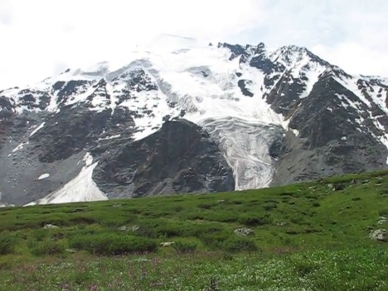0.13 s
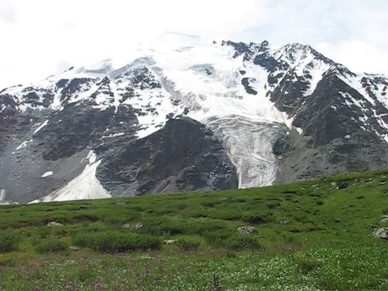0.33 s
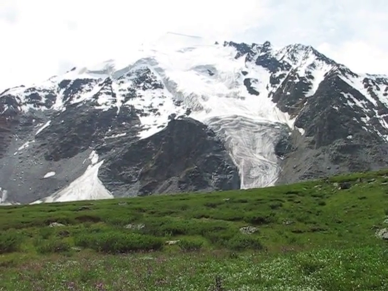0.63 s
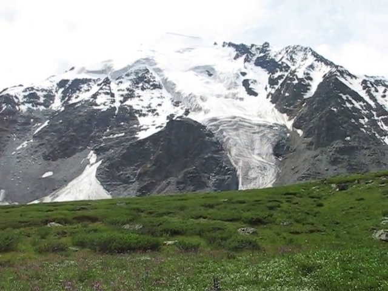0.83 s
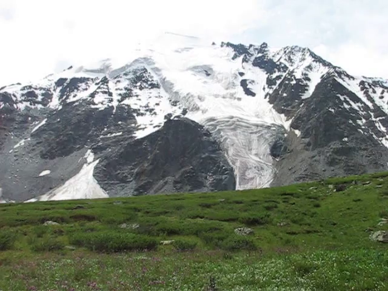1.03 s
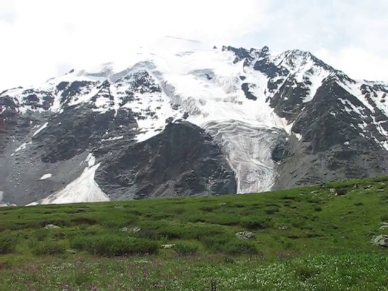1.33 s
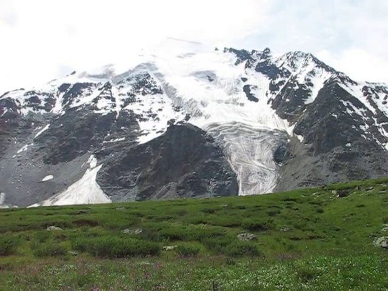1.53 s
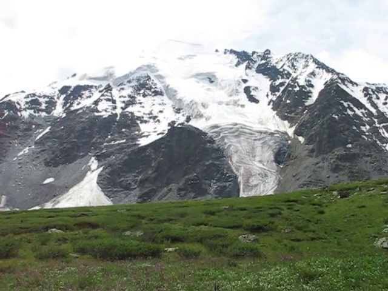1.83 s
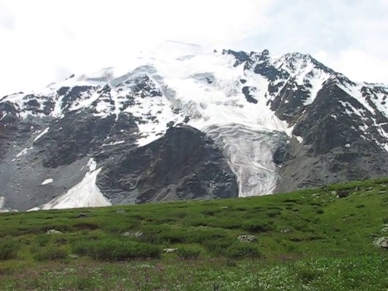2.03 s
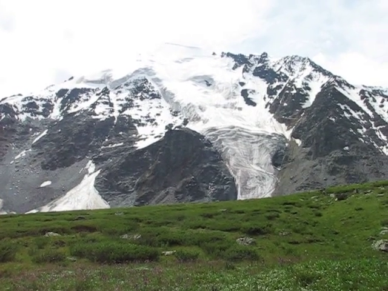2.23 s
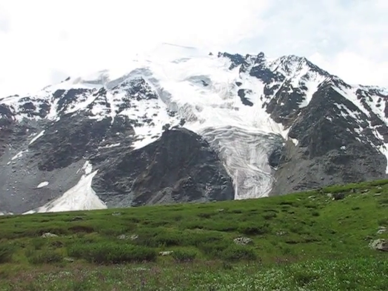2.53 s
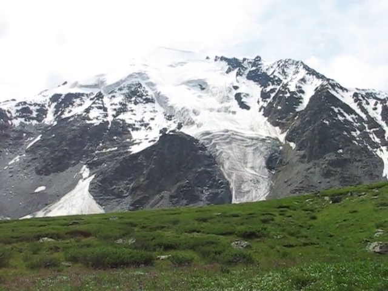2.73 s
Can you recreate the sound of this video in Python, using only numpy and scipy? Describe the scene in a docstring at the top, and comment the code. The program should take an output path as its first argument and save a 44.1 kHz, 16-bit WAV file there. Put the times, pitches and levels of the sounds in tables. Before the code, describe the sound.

Wind rumbles and buffets the microphone throughout, mostly on the left, with a soft airy swell at 0.2 seconds. The hardest gusts crack briefly at about 1.4 seconds and from 2.1 to 2.5 seconds. Behind it, a faint rush of distant water, hiss and a thin high whine dip after those gusts. Fingers lightly rub the microphone's case around 1.7 and 2.6 seconds.

```python
"""Gusty mountain-meadow wind buffets a small camera, mostly on its exposed left microphone port.
Faster air drives the eddies past more quickly, so hard gusts are brighter; the hardest crack against
the port and overload the input. Behind them lie the rush of distant meltwater and the camera's hiss
and thin whine, all dipping after the hardest gusts. One soft airy swell passes early on;
later, fingers rub the case lightly twice."""
import sys
import numpy as np
from scipy import signal
from scipy.fft import rfft, irfft, next_fast_len
from scipy.io import wavfile
from scipy.ndimage import map_coordinates

SR = 44100
rng = np.random.default_rng(int(sys.argv[2]) if len(sys.argv) > 2 else 0)


def transcribe(u):
    """Save the signal u as a 16-bit wav file named by the first command-line argument.

    u: samples, shape (n,) or (channels, n), limited to [-1, 1]; the rate is SR.
    q: integer samples, one column per channel.
    """
    v = np.clip(np.atleast_2d(u).T, -1, 1)
    q = np.round(v * 32767).astype(np.int16)
    wavfile.write(sys.argv[1], SR, q)


N = 127890
T = np.arange(N) / SR


def amp(db):
    """dB to gain."""
    return 10 ** (np.asarray(db) / 20)


def curves(rows):
    """Breakpoints to one per-sample curve for each column after the time."""
    knots_s, *columns = np.transpose(rows)
    return [np.interp(T, knots_s, column) for column in columns]


def bump(centre_s, width_s):
    """Gaussian of peak 1; full width at half height."""
    return .5 ** ((2 * (T - centre_s) / width_s) ** 2)


def wobble(knots_per_s):
    """Smooth random curve."""
    return map_coordinates(rng.standard_normal(400), [T * knots_per_s], mode="mirror")


def filtered(x, response):
    """Zero-padded FFT filter with gain response(hz)."""
    n = x.shape[-1]
    padded = next_fast_len(n + SR // 4)
    return irfft(rfft(x, padded) * response(np.fft.rfftfreq(padded, 1 / SR)), padded)[..., :n]


def coloured(white, spectrum):
    """Noise shaped by (f/Hz, level/dB) points, scaled to rms 1."""
    knots_hz, db = np.transpose(spectrum)
    noise = filtered(white, lambda hz: amp(np.interp(np.log(hz + 1), np.log(knots_hz), db)))
    return noise / noise.std()


# eddy pressure spectrum at breeze speed: f/Hz, relative level/dB
EDDY_SPECTRUM = [(15, -9.5), (60, 3), (125, 2), (200, -6.5), (300, -15), (450, -25.5), (800, -41.5),
                 (1600, -60.5), (4000, -72), (9000, -120)]


def port_roar(power, speed, bass_cut_hz=37.5, smooth_s=.024, flutter_db=1.8):
    """Frozen eddies sweep past a port: faster air, higher roar."""
    eddies = coloured(rng.standard_normal(2 * N), EDDY_SPECTRUM)
    pressure = map_coordinates(eddies, [np.cumsum(speed)], mode="mirror")
    pressure = filtered(pressure, lambda hz: (1j * hz / (bass_cut_hz + 1j * hz)) ** 2)
    lag_s = np.arange(-SR // 10, SR // 10 + 1) / SR
    window = np.exp(-8 * (lag_s / smooth_s) ** 2)
    local_power = np.abs(signal.fftconvolve(pressure ** 2, window / window.sum(), "same"))
    return pressure * np.sqrt(power / (local_power + 1e-9)) * amp(flutter_db * wobble(45))


# gusts, exposed port: t/s, level/dB, speed/breeze
GUSTS = [(0, -11.5, 1.1), (.09, -24.5, .8), (.22, -20, .75), (.42, -24, .9), (.59, -23, .95),
         (.74, -15, .9), (.85, -21, .85), (.94, -14, 1), (1.18, -22.5, .9), (1.31, -19.5, 1.4),
         (1.41, -17, 1.4), (1.47, -22, 1.1), (1.62, -18, .9), (1.72, -20, .85), (1.89, -19.5, 1),
         (1.98, -12.5, 1.5), (2.04, -17, 1.3), (2.15, -14, 1.6), (2.3, -13.5, 1.8), (2.41, -15.5, 1.45),
         (2.5, -16, 1.9), (2.64, -20.5, 1.3), (2.73, -13, 1.4), (2.9, -13, 1.5)]
# buffets, exposed port: t/s, peak level/dB, width/s, speed/breeze
BUFFETS = [(0.04, -9, .013, 1.22), (0.311, -14, 0.022, .85), (0.444, -23, .014, 1.67),
           (0.475, -8.5, .012, 1.33), (0.532, -12.5, 0.02, 1.04), (0.65, -9.5, 0.018, .75),
           (.762, -13, .02, .9), (.794, -10.5, 0.017, 1.1), (1.058, -11, 0.035, 0.77),
           (1.139, -10, .015, 1.05), (1.218, -13.5, 0.017, 1.4), (1.253, -7, .02, 1.2),
           (1.306, -13, .012, 2.3), (1.345, -4.5, .014, 1.605), (1.358, -3.5, 0.015, 1.624),
           (1.374, -6.5, .022, 2.3), (1.427, -14, 0.012, 1.244), (1.518, -12.5, 0.015, 1.06),
           (1.595, -7, .014, 1.3), (1.753, -14, 0.014, 1.094), (1.809, -8.5, .019, 1.036),
           (1.837, -12.5, 0.014, 1.037), (1.932, -4.5, 0.011, 1.65), (1.957, -6.5, .014, 1.7),
           (1.99, -12, .02, 1.5), (2.103, -2.5, .026, 1.7), (2.2, -5, .011, 2.1), (2.214, -10, .014, 3),
           (2.262, -8.5, 0.0097, 1.64), (2.279, -9.5, 0.0073, 3.01), (2.328, -9.5, .016, 2.61),
           (2.448, -10.5, 0.011, 2.38), (2.459, -7.5, 0.013, 1.5), (2.521, -14.5, 0.015, 2.08),
           (2.603, -9, 0.0097, 1.61), (2.712, -16.5, 0.017, 1.53), (2.807, -9, 0.017, 1.55)]
# wind, sheltered port: t/s, level/dB, speed/breeze
LEE_WIND = [(0, -43, 0.73), (.26, -31.5, 0.5), (.49, -45, 0.69), (.55, -25, 0.63), (.8, -34, 0.71),
            (1.13, -34, 0.68), (1.56, -25.5, 0.82), (1.75, -34.5, 0.67), (1.96, -27, 0.73),
            (2.13, -29.5, 0.77), (2.22, -19.5, 1.15), (2.36, -29.5, 0.99), (2.55, -25.5, 0.94),
            (2.68, -36.5, .75), (2.9, -29, 0.73)]


def wind():
    """Buffets ride the gusts at the exposed left port; the sheltered right only rumbles."""
    gust_db, gust_speed = curves(GUSTS)
    lee_db, lee_speed = curves(LEE_WIND)
    powers = np.array([amp(db) ** 2 * bump(at_s, width_s) for at_s, db, width_s, _ in BUFFETS]) + 1e-12
    buffet_power = powers.sum(0)
    buffet_speed = np.array(BUFFETS)[:, 3] @ powers / buffet_power  # power-weighted mean
    exposed = port_roar(amp(gust_db) ** 2, gust_speed) + port_roar(buffet_power, buffet_speed)
    sheltered = port_roar(amp(lee_db) ** 2, lee_speed)
    return np.array([exposed, sheltered])


# water spectrum: f/Hz, relative level/dB
WATER_SPECTRUM = [(60, -8), (250, -4), (450, 2.5), (850, 4), (1300, -1.5), (2000, -7.5), (3000, -16.5),
                  (6000, -51.5), (16000, -66)]


def meltwater(base_db=-44, waver_db=.32):
    """Even rush of distant water, common to both ports."""
    return amp(base_db + waver_db * wobble(6)) * coloured(rng.standard_normal(N), WATER_SPECTRUM)


# hiss spectra per port: f/Hz, relative level/dB
HISS_LEFT = [(100, 6.5), (700, -9), (1400, 0), (2300, -2.5), (3500, -6.5), (5500, -8.5), (7500, -14.5),
             (9000, -15.5), (12000, -18), (16000, -26)]
HISS_RIGHT = [(100, 12.5), (900, 0.5), (1300, 0.5), (2000, -0.5), (3300, -8.5), (6000, -10.5), (8100, -5),
              (8800, -13.5), (12000, -17.5), (16000, -22.5)]


def hiss(base_left_db=-42, base_right_db=-39.5, antiphase_share=.3):
    """Camera hiss, widened by a share in opposite phase at the two ports."""
    left, right = np.sqrt(1 - antiphase_share) * rng.standard_normal((2, N))
    opposed = np.sqrt(antiphase_share) * rng.standard_normal(N)
    return np.array([amp(base_left_db) * coloured(left + opposed, HISS_LEFT),
                     amp(base_right_db) * coloured(right - opposed, HISS_RIGHT)])


# whine tones: f/Hz, left base level/dB, right base level/dB
WHINE_TONES = [(7867, -56.5, -50), (8265, -72, -49.5)]


def whine(frames_per_s=30):
    """Two thin tones from the electronics, flipping polarity every frame."""
    polarity = np.tanh(20 * np.sin(np.pi * frames_per_s * T))
    tones = sum(amp([[left_db], [right_db]]) * np.sin(2 * np.pi * hz * T)
                for hz, left_db, right_db in WHINE_TONES)
    return polarity * tones


# swell spectrum: f/Hz, relative level/dB
SWELL_SPECTRUM = [(200, -3), (700, -9), (1400, 6), (2200, -7.5), (3500, -12), (5500, -11), (8000, -19),
                  (16000, -45)]


def air_swell(crest_s=.23, width_s=.13, peak_db=-42.5):
    """The air hisses briefly louder."""
    return amp(peak_db) * bump(crest_s, width_s) * coloured(rng.standard_normal((2, N)), SWELL_SPECTRUM)


# cracks: t/s, peak level/dB
CRACKS = [(1.358, -25), (2.108, -16.5), (2.198, -22.5), (2.265, -24), (2.458, -32.5)]
# crack spectrum: f/Hz, relative level/dB
CRACK_SPECTRUM = [(400, -1), (900, 11.5), (2200, -3.5), (4000, -19), (8000, -25), (16000, -47)]


def cracks(width_s=.0043):
    """The hardest buffets snap against the exposed port."""
    bursts = sum(amp(db) * bump(at_s, width_s) for at_s, db in CRACKS)
    return np.array([bursts * coloured(rng.standard_normal(N), CRACK_SPECTRUM), np.zeros(N)])


# rubs: t/s, length/s, body level/dB, initial fizz level/dB
RUBS = [(1.679, .23, -46.5, -49), (2.546, 0.065, -46.5, -65)]
# ticks: t/s, level/dB
TICKS = [(1.675, -44), (2.623, -43.5)]
# body and fizz spectra: f/Hz, relative level/dB
BODY_SPECTRUM = [(500, -14.5), (1500, -4), (2700, 3), (4000, -6), (5500, 1.5), (6400, -6), (7300, 1),
                 (8400, 1), (9500, -12), (12000, -26.5), (16000, -27)]
FIZZ_SPECTRUM = [(4000, -26), (9000, -3), (12000, -11), (15000, 0), (16000, -2.5)]


def handling(attack_s=.025, release_s=.029, fizz_fade_db_per_s=16, tick_t60_s=.045, left_gain_db=-7.5):
    """Fingers rub and tick on the case near the right port."""
    body_envelope, fizz_envelope = np.zeros((2, N))
    for start_s, length_s, body_db, fizz_db in RUBS:
        age_s = np.maximum(T - start_s, 0)
        stroke = np.minimum(age_s / attack_s, 1) * np.exp(-np.maximum(age_s - length_s, 0) / release_s)
        body_envelope += amp(body_db) * stroke
        fizz_envelope += amp(fizz_db - fizz_fade_db_per_s * age_s) * stroke
    for start_s, db in TICKS:
        body_envelope += (T >= start_s) * amp(db - 60 * np.abs(T - start_s) / tick_t60_s)
    body = body_envelope * coloured(rng.standard_normal((2, N)), BODY_SPECTRUM)
    fizz = fizz_envelope * coloured(rng.standard_normal((2, N)), FIZZ_SPECTRUM)
    return (body + fizz) * amp([[left_gain_db], [0]])


# gain on the base levels of water, hiss and whine: t/s, gain/dB
BACKGROUND_GAIN = [(0, 0.5), (1.335, 0), (1.385, -7.5), (1.47, -1.5), (1.66, 0.5), (1.92, 1.6), (2.02, -4),
                   (2.10, -2.5), (2.125, -7.5), (2.22, -7.5), (2.3, -7.5), (2.5, -6), (2.9, -2.5)]


def scene():
    """Wind and handling over a background that dips after the hardest gusts."""
    background_db, = curves(BACKGROUND_GAIN)
    return (wind() + amp(background_db) * (meltwater() + hiss() + whine())
            + air_swell() + cracks() + handling())


def record(dry, ceiling=1.0, band_limit_hz=15850):
    """The input soft-clips the highest peaks and cuts everything above its band limit."""
    clipped = dry / (1 + np.abs(dry / ceiling) ** 10) ** (1 / 10)
    end_fades = signal.windows.tukey(N, .001)
    return filtered(clipped * end_fades, lambda hz: hz < band_limit_hz)


dry = scene()
out = record(dry)
transcribe(out)
```